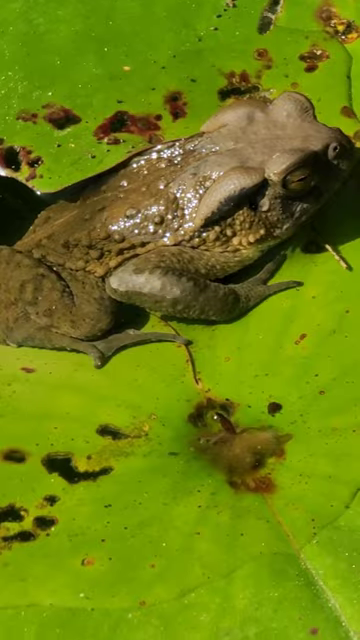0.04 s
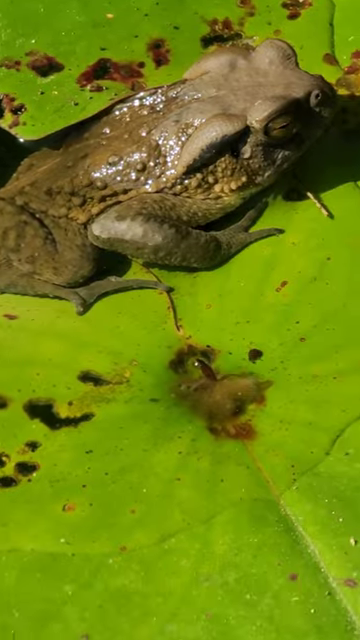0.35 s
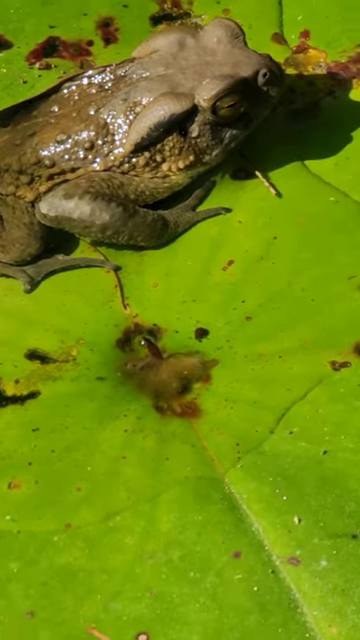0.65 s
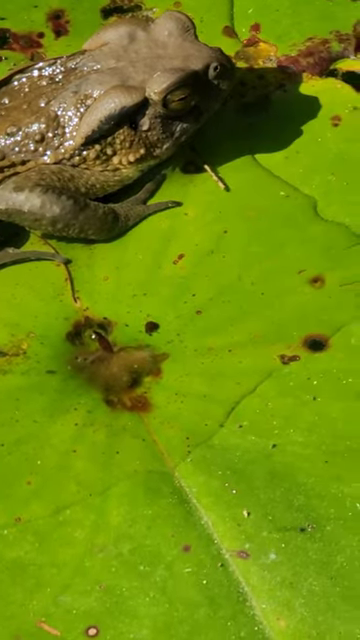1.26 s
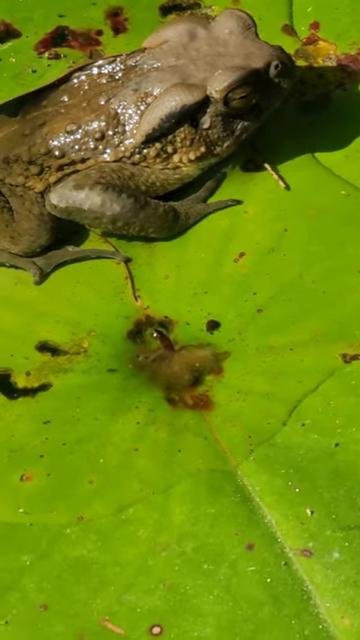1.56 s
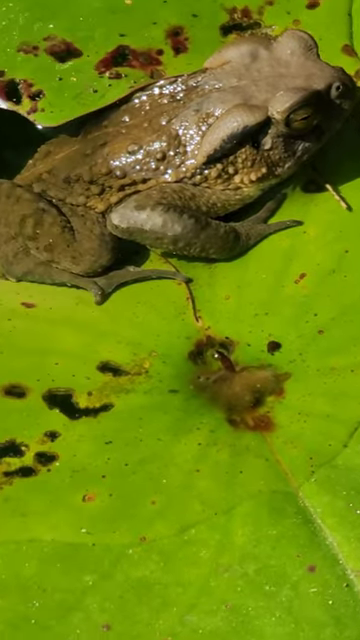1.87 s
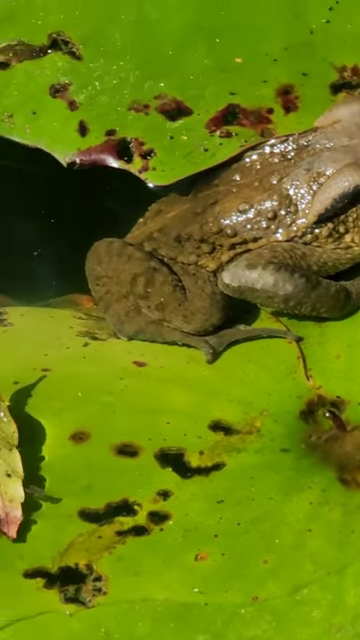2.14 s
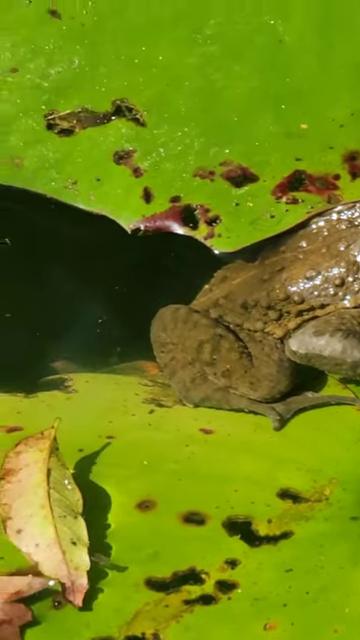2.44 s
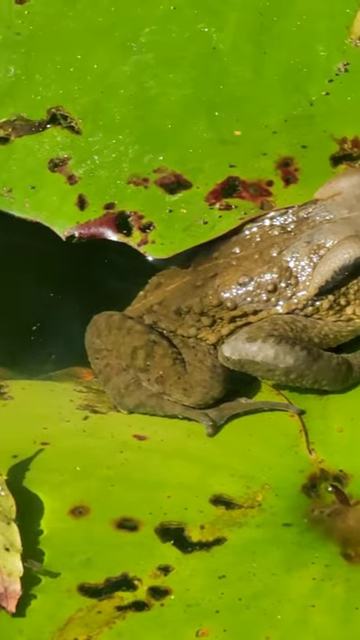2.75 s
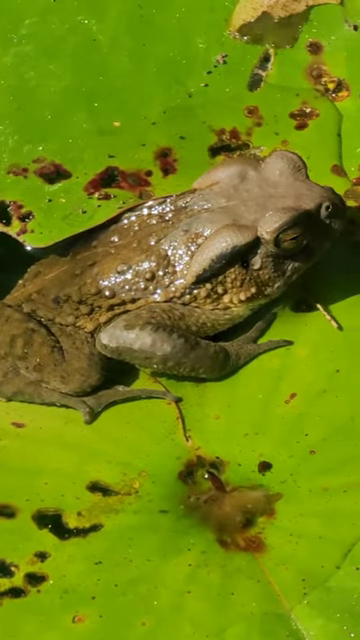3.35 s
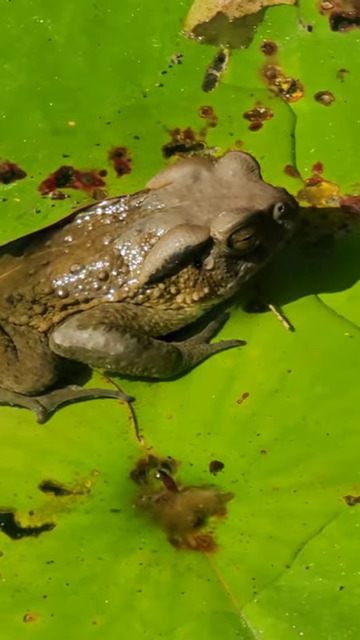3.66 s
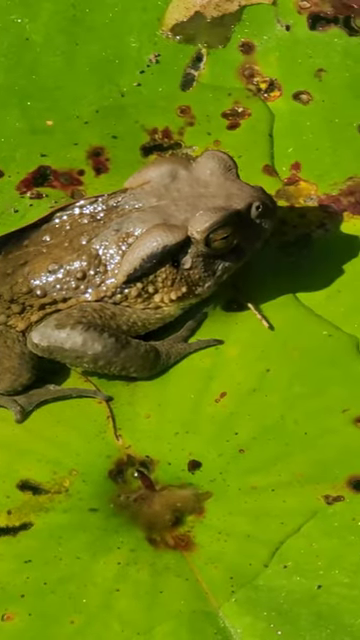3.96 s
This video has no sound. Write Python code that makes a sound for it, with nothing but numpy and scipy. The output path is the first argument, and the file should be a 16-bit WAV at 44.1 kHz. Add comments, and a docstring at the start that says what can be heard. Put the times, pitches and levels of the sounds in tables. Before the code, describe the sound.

Far-off engines and traffic drone steadily outdoors under a thin high whine and soft hiss.

```python
"""Outdoors by a pond. From the start, far-off engines drone and beat against each other under a steady
wash of traffic, while a thin whine, perhaps insects or a small fast motor, wanders between left and
right over a faint hiss. Soft low buffets, probably of air, come and go throughout. After a second a few
faint rustles join in. Towards three seconds one engine draws away, to return only faintly, and the
whine, sinking slowly in pitch all along, fades."""
import sys
import numpy as np
from scipy import signal
from scipy.fft import rfft, irfft
from scipy.io import wavfile

SR = 44100
rng = np.random.default_rng(int(sys.argv[2]) if len(sys.argv) > 2 else 0)


def output_pcm(signal):
    """Save a mono or channel-first signal as 16-bit PCM at the path in sys.argv[1].

    Samples are clipped to [-1, 1] before scaling.
    """
    pcm = np.clip(np.atleast_2d(signal).T, -1, 1) * 32767
    wavfile.write(sys.argv[1], SR, np.round(pcm).astype(np.int16))


N = 176400

# Throb of the strongest engine tone. Each row: time in seconds, level in dB.
DRONE_LEVEL = [(0, -26.5), (.15, -31.5), (.4, -37), (.9, -40), (1.1, -41), (1.4, -35.5), (1.7, -35),
               (2.0, -32), (2.3, -34), (2.43, -28), (2.6, -36.5), (2.76, -28.5), (2.92, -40.5),
               (3.17, -29.5), (3.35, -37), (3.48, -35), (3.63, -33), (3.75, -32.5), (4, -32.5)]
# The engine tones around it. Each row: pitch in Hz, level in dB, waver in dB.
HUM_TONES = [(40.16, -38.5, 0.1), (122.14, -48.5, 0), (193, -65, 8), (342.6, -62, 6.5), (414, -66, 5.5),
             (436, -63.5, 1.5)]
# Harmonics of the departing engine. Each row: multiple of its pitch, relative level in dB.
MOTOR_HARMONICS = [(2, 1), (3, -16.5), (4, -16), (6, -18), (7, -14), (8, -19.5), (9, -22.5), (10, -17.5)]
# Its fader. Each row: time in seconds, level in dB.
MOTOR_LEVEL = [(0, -43), (.15, -42), (.4, -44.5), (.95, -42), (1.3, -43.5), (1.7, -44), (2.45, -46),
               (2.9, -61), (4, -52)]

# Stereo image of all noise. Each row: frequency in Hz, side minus mid in dB, left minus right in dB.
STEREO_IMAGE = [(60, -12, -1.5), (120, -14.5, 2), (202, -15.5, -4), (397, -3.5, -1.7), (695, -5, -2),
                (1210, 0.5, -3.5), (2330, -0.5, -2), (3580, 2.5, 2.5), (4470, -7, -5.5), (5430, -1.5, -3),
                (6900, 1.5, -4), (8250, -1.5, 1.5), (14000, 1.5, -0.5)]
# Colours of the noise layers. Each row: frequency in Hz, relative spectral density in dB.
RUMBLE_COLOUR = [(10, -31), (20, -10), (32, -12), (50, 7), (85, -4), (140, -8), (200, -17), (255, -22),
                 (400, -19), (1000, -56.5)]
EXHAUST_COLOUR = [(150, -12.5), (280, -4.5), (350, -5), (450, 0.5), (550, -2), (640, -6.5), (800, -15),
                  (1500, -47.5)]
TYRE_COLOUR = [(400, -31), (800, -7), (1050, 0), (1380, -3), (1700, -11.5), (2500, -16.5), (4000, -19),
               (8000, -44.5)]
HISS_COLOUR = [(1200, -18), (2500, -10), (3300, 2), (4000, -4), (4600, -2), (5200, 1), (5650, -7.5),
               (6700, -3), (7700, -9.5), (10000, -18.5), (12500, -38.5), (15500, -39)]
SHEEN_COLOUR = [(8000, -16), (11000, -13), (13500, -3), (15500, -3)]  # the very top of the hiss
BUFFET_COLOUR = [(10, -49), (25, -8), (45, -1.5), (80, 4), (130, -9), (180, -6), (270, -19.5), (500, -28),
                 (1000, -66.5)]
RUSTLE_COLOUR = [(500, -6), (900, 3), (2000, -1), (3200, -2), (4500, 3), (6000, -14), (12000, -22)]
# Faders of the noise beds. Each row: time in seconds, level in dB.
RUMBLE_LEVEL = [(0, -43), (.9, -42), (1.4, -41), (2.4, -39.5), (4, -41.5)]
EXHAUST_LEVEL = [(0, -46.5), (.17, -47), (.4, -50.5), (.7, -48), (.9, -49), (1.1, -50.5), (1.33, -48),
                 (1.46, -52), (1.85, -49.5), (2.1, -48.5), (2.45, -51), (2.9, -49), (3.13, -53),
                 (3.3, -50.5), (3.72, -51.5), (4, -47)]
TYRE_LEVEL = [(0, -52), (.35, -51.5), (.6, -53), (.7, -50.5), (.8, -52.5), (1.0, -52.5), (1.23, -49.5),
              (1.67, -53.5), (1.83, -51), (2.15, -52.5), (2.42, -50), (2.65, -52.5), (2.88, -51.5),
              (3.1, -52), (4, -53)]
HISS_LEVEL = [(0, -60.5), (1.9, -61.5), (2.08, -58), (2.55, -60), (2.85, -58.5), (3.1, -62.5), (4, -62)]
SHEEN_LEVEL = [(0, -92), (1.3, -87), (1.45, -72), (1.9, -76), (2.35, -70), (4, -70.5)]
# Brief exhaust swells. Each row: peak time in seconds, level in dB, half length in seconds, centre in Hz.
EXHAUST_SWELLS = [(0.187, -48, 0.026, 510), (0.706, -43, 0.02, 554), (0.967, -51, 0.026, 360),
                  (1.09, -43.5, 0.028, 480), (1.25, -48, 0.026, 365), (1.886, -46.5, 0.036, 438),
                  (2.65, -56, .08, 463), (3.03, -53, 0.13, 399), (3.34, -53.5, 0.2, 330)]

# Glide of the whine's main partial, which the others follow. Each row: time in seconds, pitch in Hz.
WHINE_GLIDE = [(0, 4990), (.65, 4986), (.85, 4972), (1.1, 4964), (1.35, 4971), (1.6, 4973), (1.9, 4969),
               (2.15, 4954), (2.7, 4945), (3.1, 4938), (4, 4933)]
# Moves of the main partial. Each row: time in seconds, level in dB relative to MAIN_DB,
# left minus right in dB, phase lead of the left side in cycles.
WHINE_MOVES = [(0, -3, 1, 0), (.12, -1, 3, -.1), (.2, -5.5, 11, -.25), (.35, -3, -1, -.5), (.5, 1, -1, -.3),
               (.65, -3.5, -9, -.38), (.73, -2.5, -7, -.36), (.79, -13, -2, -.5), (.93, -6.5, -8, -.1),
               (1.02, -15, -4, 0), (1.1, -4, 2, 0), (1.25, -6, 9, -.1), (1.38, -3, 5, -.12),
               (1.52, -9, 3, -.5), (1.6, -7, -8, -.9), (1.71, -3.5, -5, -1), (1.79, -10, -1, -.9),
               (1.95, -3, -8, -.85), (2.06, -6, 8, -1), (2.16, -10, 2, -.5), (2.3, -4.5, -6, .1),
               (2.5, -6.5, 9, .22), (2.6, -17, 2, .5), (2.72, -5.5, -2, 1), (2.87, -14, -1, 1.2),
               (3.0, -11, 0, 1.25), (3.17, -17, -2, 1.5), (3.26, -11.5, -8, 2), (3.36, -11.5, -8, 2.2),
               (3.44, -19, 0, 2.2), (3.62, -11, 3, 2), (3.79, -13, 1, 1.9), (3.87, -19, 0, 1.8),
               (4, -14, -4, 1.9)]
# The weaker partials. Each row: starting pitch in Hz, peak in dB relative to WEAK_DB,
# peak time in seconds, half length in seconds, reflected share of the amplitude.
WEAK_PARTIALS = [(3185, -9, 3.2, 1.5, .7), (3328, -.5, .58, .115, .15), (3328, -6.5, .15, .16, .3),
                 (3331, -6, 2.8, .3, .4), (3477, -4.5, .8, .7, .4), (3477, -4, 2.35, .4, .4),
                 (3719, -9, .5, .25, .6), (4404, -6, .8, .6, .6), (4398, -4, 2.2, .16, .4),
                 (4398, .5, 2.72, .14, .25), (4398, -1, 3.24, .09, .25), (4398, -6, 3.75, .25, .5),
                 (4597, -9, 2, 2, .7), (4670, -8, 2.6, 1.4, .7), (4839, -3.5, .9, 1, .55),
                 (4839, -1, 1.9, .15, .3), (4839, -2, 2.6, .13, .3), (4839, -1, 3.52, .18, .3),
                 (5151, -2.5, .9, 1.0, .7), (5141, -3, 2.85, .55, .7), (5307, -7, 2.6, 1.4, .7),
                 (5465, -13, 2, 2, .7), (6220, -11, 2.8, .9, .7), (6519, -10, 2.0, 1.4, .7)]
MAIN_DB, WEAK_DB = -52, -62

# Soft low buffets. Each row: peak time in seconds, level in dB, half length in seconds.
BUFFET_SWELLS = [(.02, -42, 0.028), (.165, -33, 0.034), (.5, -37, 0.052), (.92, -47.5, 0.086),
                 (1.07, -44.5, 0.038), (1.63, -36.5, 0.035), (2.155, -30.5, 0.024), (2.235, -31, 0.015),
                 (2.45, -38, 0.035), (2.76, -36.5, .035), (2.86, -43.5, 0.015), (3.26, -39, 0.025),
                 (3.47, -39.5, 0.027), (3.62, -44, 0.054)]
# Rustles. Each row: peak time in seconds, level in dB, half length in seconds, tilt in dB per octave.
RUSTLE_SWELLS = [(1.22, -64, .04, -1), (1.35, -62, .025, -1), (1.63, -63, .012, -1), (2.443, -55.5, .02, 0),
                 (2.86, -59.5, .026, 2.5)]

SIDES = np.array([[1], [-1]])  # left, right
TIME = np.arange(N) / SR
FROM_MIDDLE = TIME - N / 2 / SR  # seconds; engine pitches are set for mid-scene


def undb(db):
    """Decibels to gain."""
    return 10 ** (np.asarray(db) / 20)


def curve(rows, column=1):
    """An automation lane: one column of a time table, joined by straight lines."""
    rows = np.array(rows)
    return np.interp(TIME, rows[:, 0], rows[:, column])


def across(rows, hz, column=1):
    """An EQ curve: one column of a frequency table, read on a log axis."""
    rows = np.array(rows)
    return np.interp(np.log(np.maximum(hz, 1)), np.log(rows[:, 0]), rows[:, column])


def drift(rate):
    """Smooth random motion with spread 1 that changes about `rate` times a second."""
    size, steps_per_s = 4096, 500
    lowpass = np.exp(-2 * (np.arange(size // 2 + 1) * steps_per_s / size / rate) ** 2)
    slow = irfft(rfft(rng.standard_normal(size)) * lowpass) / np.sqrt(np.mean(lowpass ** 2))
    return np.interp(TIME * steps_per_s, np.arange(size), slow)


def wash(colour, flicker_db, rate):
    """Coloured stereo noise near unit level; each octave swells and sinks by itself."""
    hz = np.arange(N // 2 + 1) * SR / N
    gain, width = undb(across(colour, hz)), undb(across(STEREO_IMAGE, hz))
    pan = undb(SIDES * across(STEREO_IMAGE, hz, column=2) / 2)
    mid, side = rfft(rng.standard_normal((2, N)))
    stereo = (mid + SIDES * width * side) / np.hypot(1, width) * pan
    spectrum = stereo * gain / np.sqrt(np.mean(gain ** 2))
    octave = np.log2(np.maximum(hz, 1) / 10)
    bands = (irfft(spectrum * np.maximum(1 - abs(octave - k), 0), N) for k in range(12))
    return sum(band * undb(flicker_db * drift(rate)) for band in bands)


def swell(at, db, half):
    """A bell-shaped fade up and down, peaking at `at` seconds."""
    return undb(db) * np.exp(-((TIME - at) / half) ** 2 / 2)


def tone(hz):
    """An oscillator: a turning phasor whose real part has unit level."""
    return np.sqrt(2) * np.exp(2j * np.pi * (np.cumsum(hz) / SR + rng.random()))


def far_engines(drone_hz=61.9, sag_per_s=.00313):
    """Low engine tones that sag slightly, waver and beat against each other."""
    speed = 1 - sag_per_s * FROM_MIDDLE + .00379 * drift(3.17)
    drone = tone(drone_hz * speed).real * undb(curve(DRONE_LEVEL) + .7 * drift(10))
    hum = sum(tone(hz * speed).real * undb(db + waver * drift(9.6)) for hz, db, waver in HUM_TONES)
    return drone + hum


def departing_motor(pitch_hz=52.05, sag_per_s=.008):
    """An engine slows a little and draws away; each harmonic fades in and out by itself."""
    hz = pitch_hz * (1 - sag_per_s * FROM_MIDDLE + .0028 * drift(5.1))
    harmonics = sum(tone(k * hz).real * undb(db + 2.6 * drift(7.8)) for k, db in MOTOR_HARMONICS)
    return harmonics * undb(curve(MOTOR_LEVEL))


def traffic():
    """Rumble, exhaust roar and tyre wash, dulled by distance and swelling on the air."""
    rumble = wash(RUMBLE_COLOUR, flicker_db=1, rate=22) * undb(curve(RUMBLE_LEVEL))
    exhaust = wash(EXHAUST_COLOUR, flicker_db=1.4, rate=16) * undb(curve(EXHAUST_LEVEL))
    skirt = 1.11  # frequency ratio at which a swell is 30 dB down
    for at, db, half, hz in EXHAUST_SWELLS:
        band = [(hz / skirt**2, -70), (hz / skirt, -30), (hz, 0), (hz * skirt, -30), (hz * skirt**2, -70)]
        exhaust += wash(band, flicker_db=0, rate=10) * swell(at, db, half)
    tyres = wash(TYRE_COLOUR, flicker_db=1.1, rate=18) * undb(curve(TYRE_LEVEL))
    return rumble + exhaust + tyres


def hiss():
    """A smooth bed of air and leaves; its top sheen opens up at about 1.4 seconds."""
    bed = wash(HISS_COLOUR, flicker_db=.5, rate=20) * undb(curve(HISS_LEVEL))
    sheen = wash(SHEEN_COLOUR, flicker_db=1.5, rate=12) * undb(curve(SHEEN_LEVEL))
    return bed + sheen


def whine_partial(hz, share, lead_cycles, fade_rate=19):
    """A thin tone that reaches one side first; shifting reflections fade it differently on each side."""
    reflected = np.array([drift(fade_rate) + 1j * drift(fade_rate) for _ in SIDES]) / np.sqrt(2)
    direct = np.exp(1j * np.pi * lead_cycles * SIDES) * np.sqrt(1 - share ** 2)
    return (tone(hz) * (direct + share * reflected)).real


def whine():
    """A cluster of thin partials sinking together; the main one surges and wanders between the sides."""
    pitch = curve(WHINE_GLIDE) * (1 + .00028 * drift(18))
    glide = pitch / WHINE_GLIDE[0][1]
    pan_db = SIDES * curve(WHINE_MOVES, column=2) / 2
    main = whine_partial(pitch, share=.15, lead_cycles=curve(WHINE_MOVES, column=3))
    main *= undb(MAIN_DB + curve(WHINE_MOVES) + pan_db)
    weak = sum(whine_partial(hz * glide, share, lead_cycles=-.23) * swell(at, WEAK_DB + db, half)
               for hz, db, at, half, share in WEAK_PARTIALS)
    return main + weak


def buffets():
    """Soft bumps of bass noise, probably puffs of air."""
    return wash(BUFFET_COLOUR, flicker_db=1, rate=5.4) * sum(swell(*row) for row in BUFFET_SWELLS)


def rustles():
    """Faint, short brushes of fluttering noise, some brighter than others."""
    out = 0
    for at, db, half, tilt in RUSTLE_SWELLS:
        colour = [(hz, level + tilt * np.log2(hz)) for hz, level in RUSTLE_COLOUR]
        out = out + wash(colour, flicker_db=1.5, rate=90) * swell(at, db, half)
    return out


def scene():
    """The full mix at the water's edge."""
    return far_engines() + departing_motor() + traffic() + buffets() + hiss() + rustles() + whine()


def record(dry):
    """A steep high cut takes the very top off the mix."""
    return signal.sosfilt(signal.ellip(10, .1, 80, 15500, fs=SR, output="sos"), dry)


dry = scene()
out = record(dry)
output_pcm(out)
```